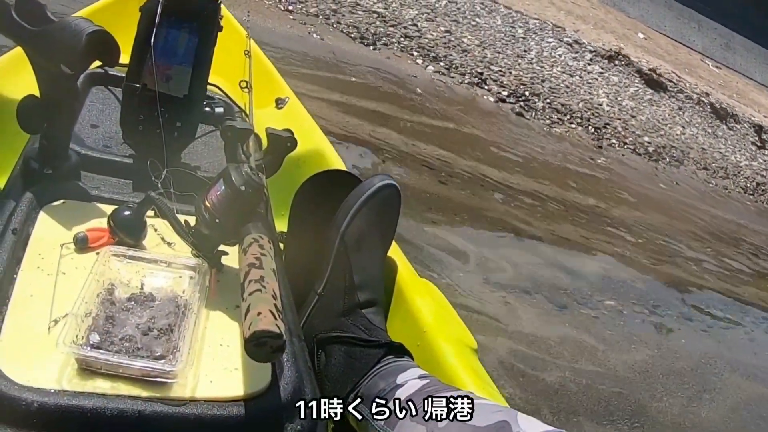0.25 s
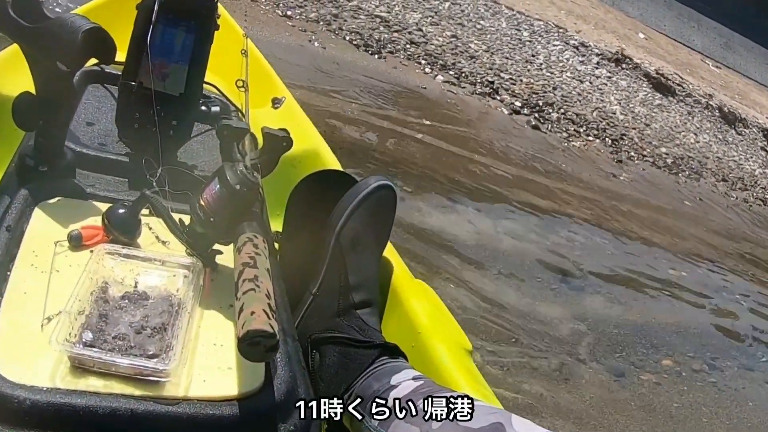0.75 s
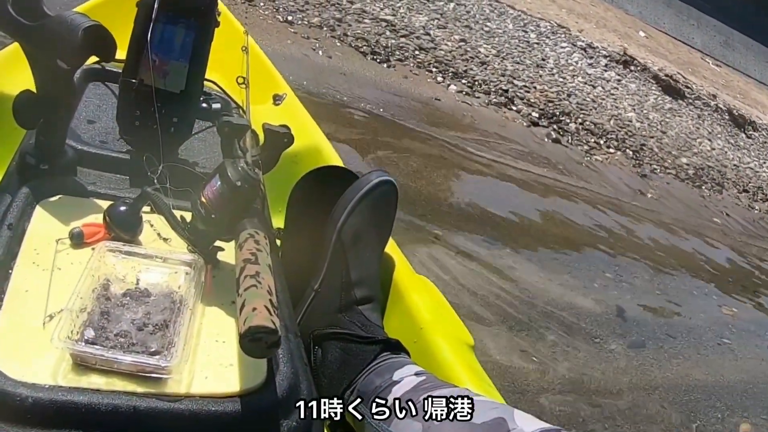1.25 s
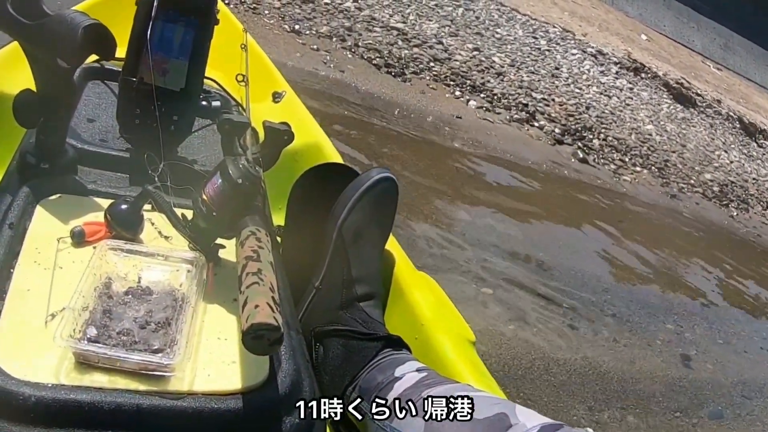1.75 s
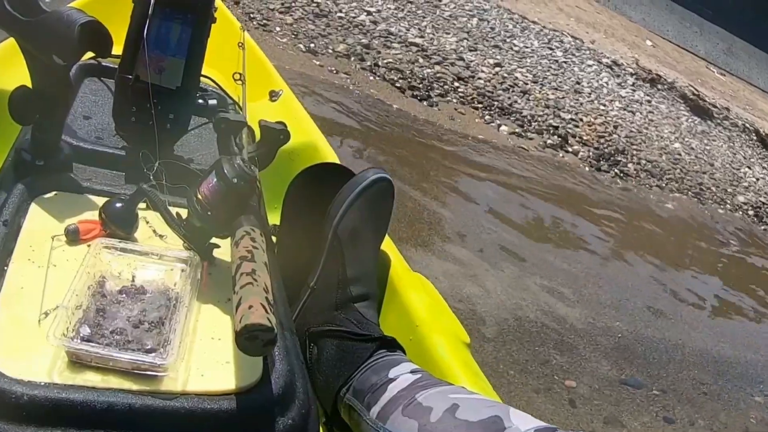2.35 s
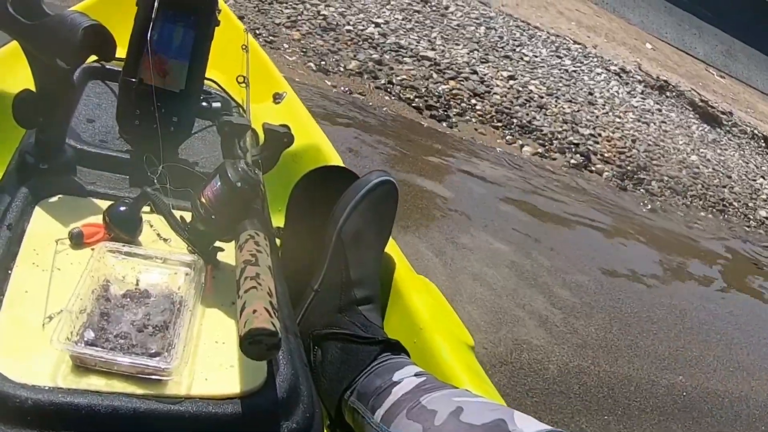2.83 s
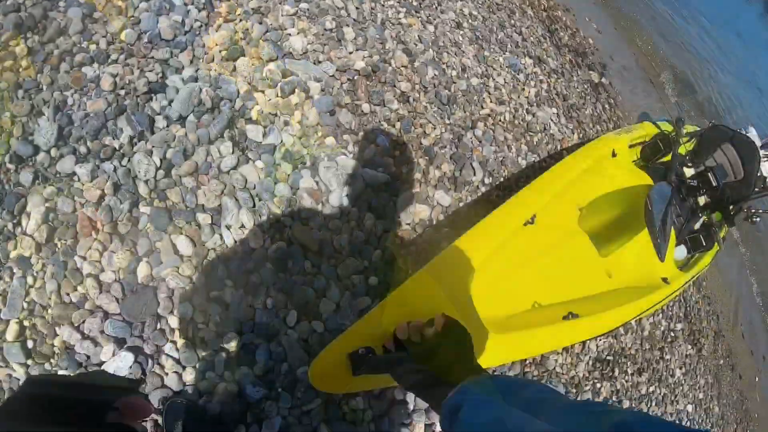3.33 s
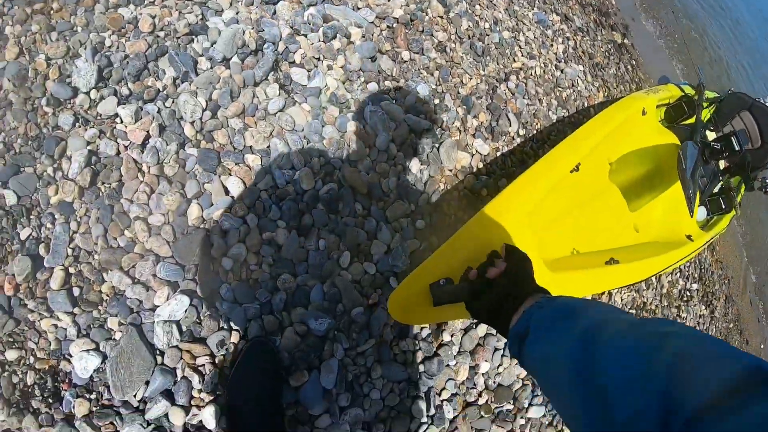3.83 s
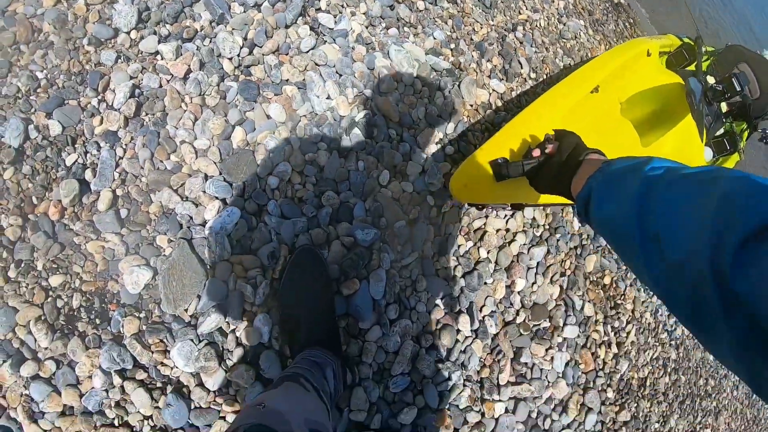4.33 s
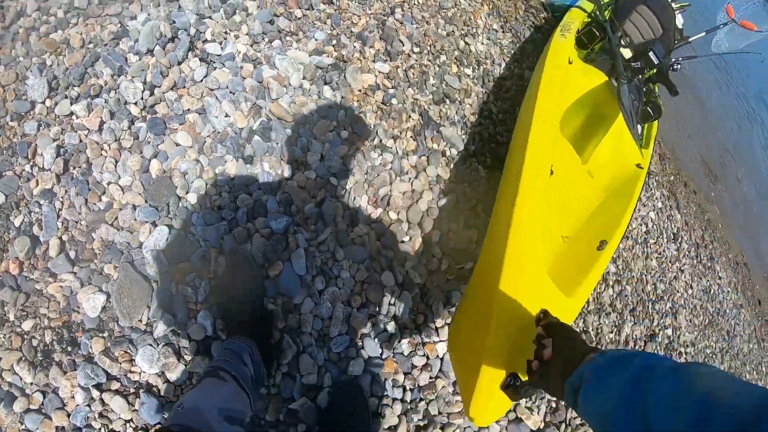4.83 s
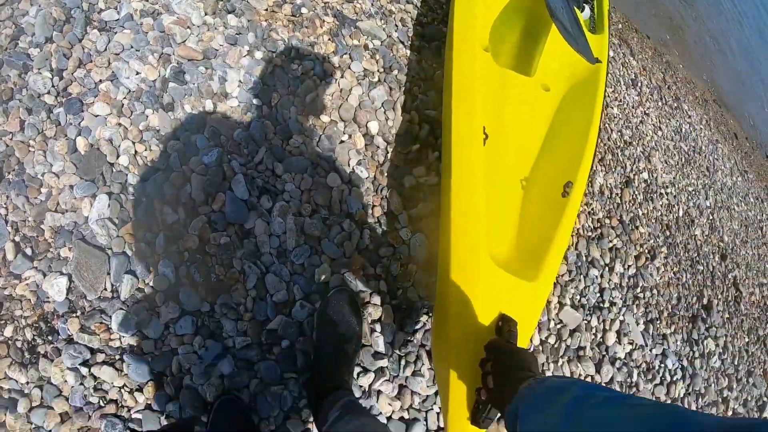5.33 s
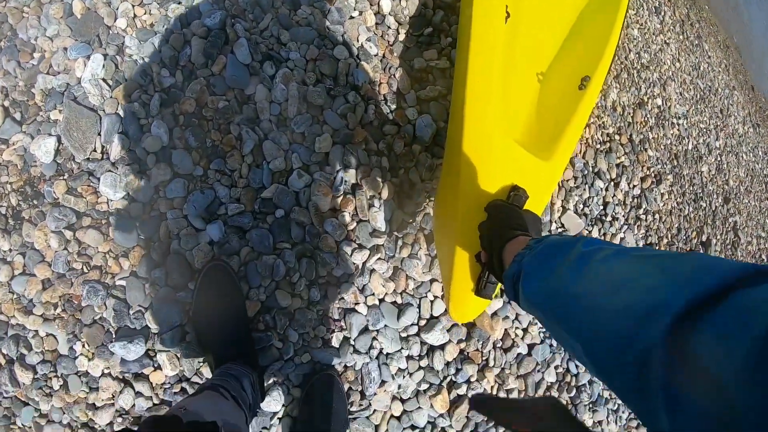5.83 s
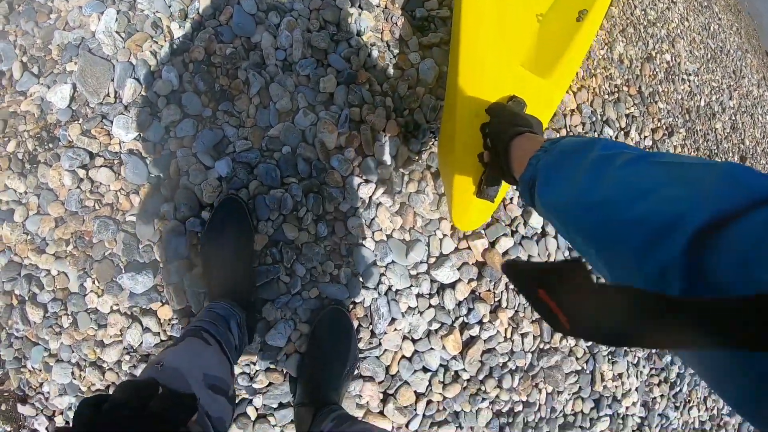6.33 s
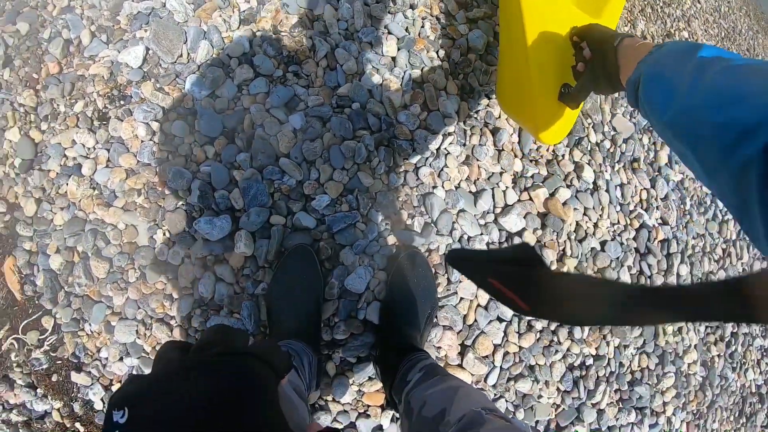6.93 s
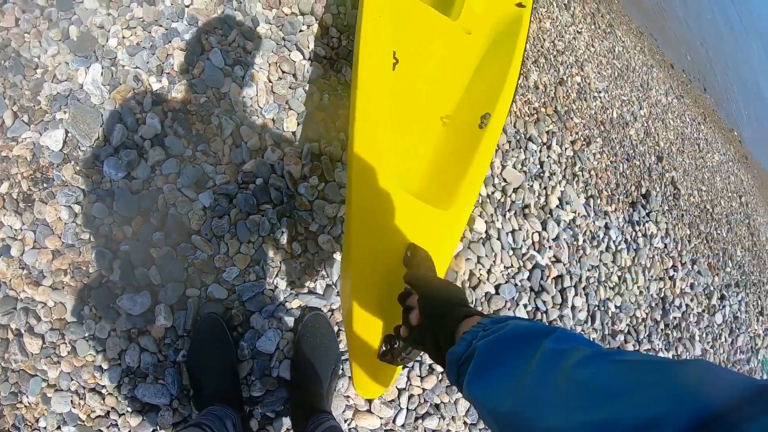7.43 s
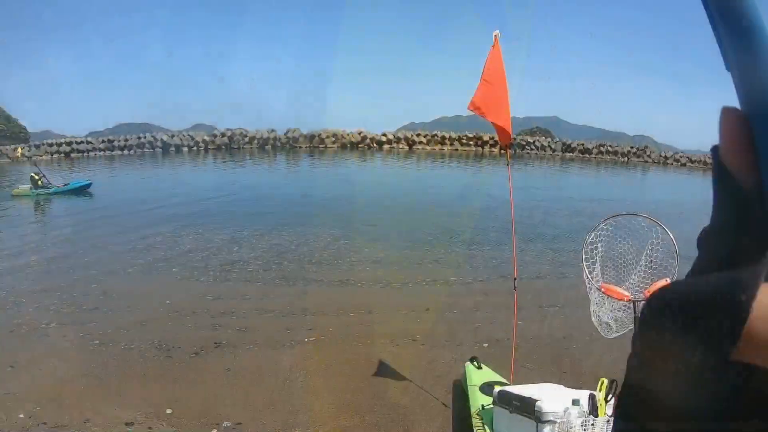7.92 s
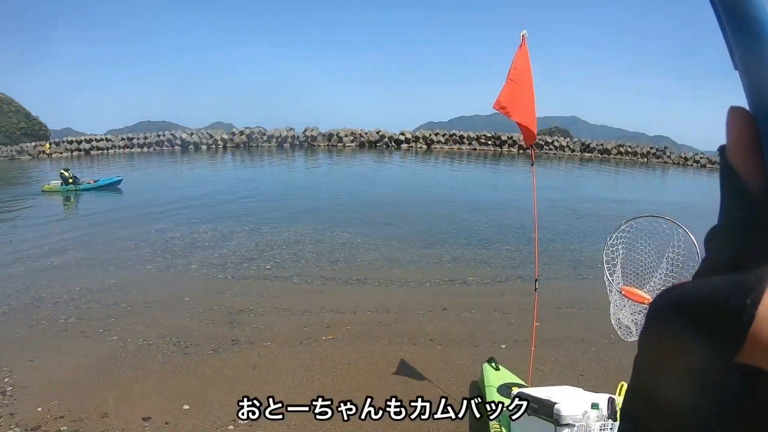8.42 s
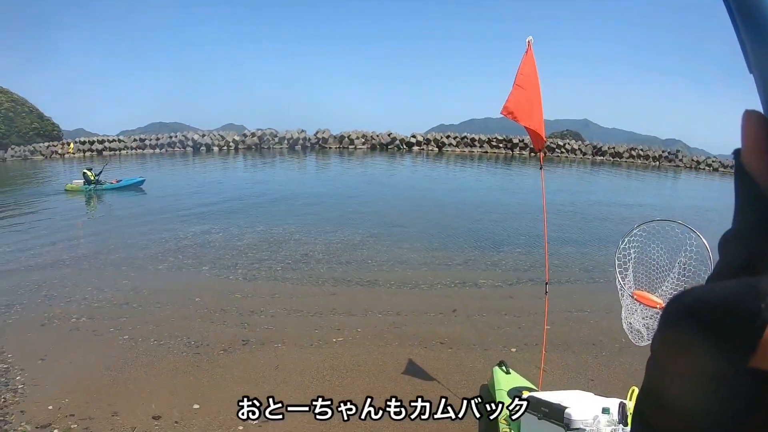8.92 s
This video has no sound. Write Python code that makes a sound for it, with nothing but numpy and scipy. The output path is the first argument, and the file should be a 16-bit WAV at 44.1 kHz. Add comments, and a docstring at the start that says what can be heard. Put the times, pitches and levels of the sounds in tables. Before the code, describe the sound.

Outdoors on a pebble beach, heard from a body-worn microphone: first a nearly mono rumble of wind, low droning hum, little bubbles and drops, and a growing sandy hiss. Next come loud, wide, irregular pebble crunches with sharp stone clicks and dull drum-like knocks from a dragged plastic boat. After the hauling stops, only low buffeting wind, quiet water and tiny ticks remain.

```python
"""Landing a plastic kayak

Afloat, turbulence rumbles at the microphone ports over a distant hum, wavelets and a keel hissing onto sand.
Then boots crunch on pebbles, as bursts of noise and short ringing stones, while the hollow hull is hauled
in jerks: its damped modes boom when struck. At last wind, a murmur of water and small ticks remain.
The opening and the close are nearly without stereo width.
"""
import sys
import numpy as np
from scipy import signal
from scipy.fft import rfft, irfft, next_fast_len
from scipy.io import wavfile

SR = 44100
rng = np.random.default_rng(int(sys.argv[2]) if len(sys.argv) > 2 else 0)


def transcribe(u):
    """Save the signal u as a 16-bit wav file named by the first command-line argument.

    u: samples, shape (n,) or (channels, n), limited to [-1, 1]; the rate is SR.
    q: integer samples, one column per channel.
    """
    v = np.clip(np.atleast_2d(u).T, -1, 1)
    q = np.round(v * 32767).astype(np.int16)
    wavfile.write(sys.argv[1], SR, q)


N = 404454

# Boots pressing into pebbles. Each row: full load reached in seconds, hold in seconds, level in dB,
# rise and fall in seconds per 20 dB, grind relative to the level in dB, treble gain in dB, left-right in dB.
BOOT_PRESSES = [(3.4, 0.12, -38.5, 0.038, 0.23, -7, -28, -2.5),
                (3.55, 0.031, -28, 0.22, 0.48, -9.5, 2, 1.5),
                (3.78, 0.019, -30, 0.019, 0.093, -5.5, -13, 2),
                (3.85, 0.072, -30, 0.16, 0.11, -18, -3.5, -2),
                (4.04, .02, -28.5, 0.09, 0.013, -13.5, -3.5, -0.5),
                (4.085, 0.0077, -29.5, 0.022, 0.027, -6.5, -0.5, 1),
                (4.15, 0.0052, -29, 0.055, 0.039, -10.5, -18.5, -2),
                (4.25, 0.082, -38, 0.24, 0.091, -6.5, -2, 2.5),
                (4.43, 0.0054, -37.5, 0.037, 0.05, -2, -4, -2), (4.55, .01, -38, 0.052, 0.081, 0, -17, 1),
                (4.76, 0.076, -25.5, 0.12, 0.26, -9.5, -17, 2),
                (4.95, 0.041, -33.5, 0.053, 0.096, -8, 1, 2),
                (5.055, 0.0067, -27.5, 0.03, 0.057, 1, -6, 2.5), (5.22, .04, -29, 0.13, .2, -14.5, -0.5, 2),
                (5.33, .01, -39, 0.036, .06, -13, -7.5, 3), (5.44, 0.03, -28.5, 0.17, .1, -14.5, 9, 2.5),
                (5.51, 0.012, -28, 0.079, .02, -22.5, 5, 1), (5.62, .01, -28, 0.13, 0.11, -13, 1, 0),
                (5.669, .02, -29, 0.11, .15, -15.5, 1, 1), (5.8, 0.19, -48.5, 0.12, 0.15, -32.5, 5, 0.5),
                (6.03, .03, -56, .1, .1, -20, 9.5, -1), (6.09, 0.0037, -44.5, 0.033, 0.013, 2, 10, 4),
                (6.148, 0.0033, -38, 0.015, 0.01, -3.5, 2, 0),
                (6.19, 0.0056, -35, 0.018, 0.017, -5, -2.5, 1.5),
                (6.38, 0.045, -26.5, 0.19, 0.27, -13.5, -5, 4), (6.49, 0.041, -27, 0.16, 0.14, -17.5, 6, 4),
                (6.58, 0.011, -34.5, 0.046, 0.029, -1.5, 3, 3), (6.72, .08, -52, .1, .1, 0, -4.5, 2),
                (6.83, 0.0045, -41.5, 0.014, 0.26, -5, -10, 1),
                (6.99, 0.019, -35.5, 0.06, 0.046, -1, -11, 2), (7.1, .12, -55.5, .1, .1, 3, -7, -1),
                (7.29, 0.12, -37, .07, 0.038, -3, -2, 1), (7.47, 0.012, -39, 0.045, .1, 13, -1, 6),
                (7.55, 0.0087, -28.5, 0.096, 0.089, -4, 4.5, 4.5),
                (7.62, 0.0062, -29.5, 0.11, 0.1, -6, 3, 0.5),
                (7.71, 0.0072, -41.5, 0.035, 0.061, -10, 5, 3.5),
                (7.81, 0.025, -42, 0.056, 0.077, -12, -11, 0)]
# Jerks of the hull over the stones. Each row: full speed reached in seconds, hold in seconds, level in dB,
# rise and fall in seconds per 20 dB, grind and keel thump relative to the level in dB.
HULL_JERKS = [(4.05, 0.0082, -35, .06, 0.079, -17, -14), (4.35, 0.058, -42, 0.13, .1, -8.5, -12),
              (4.5, 0.0075, -17, 0.058, 0.092, -11.5, -34), (4.56, 0.017, -14, 0.027, 0.089, -15, -7.5),
              (4.63, 0.082, -19.5, 0.19, .12, -9, -4.5), (4.78, 0.0083, -25, 0.1, 0.11, -16.5, -26),
              (4.92, 0.036, -21, 0.089, 0.35, -10, -12.5), (5.089, 0.05, -16, 0.073, .2, -13.5, -19),
              (5.25, 0.015, -35, 0.085, 0.049, -9.5, -0.5), (5.74, 0.017, -35.5, 0.28, 0.094, -18.5, -14),
              (6.4, .17, -44, 0.11, .1, -9.5, -18.5), (6.84, 0.086, -30.5, .12, 0.058, -13, -14.5),
              (7.0, 0.086, -21.5, .05, 0.25, -13.5, -12.5), (7.17, 0.017, -29, 0.11, .06, -6.5, -10),
              (7.27, 0.14, -29.5, .1, 0.22, -5.5, -8), (7.46, 0.037, -19.5, 0.071, 0.13, -14, -21),
              (7.561, 0.015, -15.5, 0.092, 0.17, -15, -17), (7.67, .01, -40, 0.044, 0.84, -32, 1.5)]
# Single stones clacking. Each row: start in seconds, strength in dB, main pitch in Hz, left-right in dB.
STONE_CLACKS = [(3.2914, -34, 1480, -4.0), (3.3119, -34, 2120, -4), (3.3398, -40, 1220, -6),
                (3.382, -33.5, 1210, -17), (3.4008, -15, 2970, -7), (3.4301, -27, 4860, -8),
                (3.4705, -15, 4020, -3), (3.5219, -27, 5090, -5.0), (3.5528, -13, 3980, 2),
                (3.61, -12, 3000, -3.0), (3.6287, -16, 4790, -3), (3.6671, -12, 6060, -6.0),
                (3.7768, -21.5, 1200, -4.5), (3.801, -11, 6450, -5.0), (3.8124, -21, 3190, -6.5),
                (3.8442, -13, 6470, -10), (3.8522, -13, 4270, -8.5), (3.8611, -13.5, 3930, -20),
                (3.8771, -19, 3170, -12), (3.903, -19, 3260, -8.5), (3.9297, -17, 3290, -14),
                (3.969, -15, 3860, -10), (3.995, -9.5, 5340, -13), (4.013, -18, 3340, -11),
                (4.0302, -6, 4700, -16), (4.0463, -9, 5300, -8.0), (4.056, -9.5, 4290, -15),
                (4.087, -18, 3150, -11), (4.123, -26, 6370, -7.0), (4.133, -14, 6600, -5.5),
                (4.1454, -20, 3270, -6.5), (4.191, -16.5, 9700, -17), (4.226, -15.5, 4160, -4),
                (4.2448, -24, 4310, -3.5), (4.2762, -32, 3380, -3.5), (4.2824, -28, 3040, -2),
                (4.3195, -23, 3100, -3.0), (4.3283, -23.5, 3200, -5.5), (4.4267, -26, 2800, -5.5),
                (4.4785, -21, 1690, -10), (4.5057, -19, 1510, -12), (4.543, -16.5, 1410, -16),
                (4.5742, -15, 1580, -9), (4.596, -16, 1480, -9), (4.6254, -25, 1600, -7.0),
                (4.665, -20, 1360, -11), (4.7025, -14.5, 3080, -9), (4.7702, -15.5, 3030, -12),
                (4.8904, -5.5, 10200, -18), (4.9347, -22, 1380, -8), (4.9531, -4.5, 6850, -9),
                (4.9756, -12, 3480, -7), (5.0015, -19, 3370, -9), (5.0489, -8.5, 4430, -6),
                (5.0943, -18, 1700, -12), (5.1213, -19, 1540, -10), (5.1632, -27, 1410, -4.5),
                (5.1904, -14, 6640, -4.0), (5.217, -10, 5640, -3), (5.2609, -10, 5900, -9),
                (5.3115, -8, 5450, -4), (5.3564, -27, 3220, -4.0), (5.4036, -14, 8920, -4.5),
                (5.432, -14, 4600, -4.0), (5.5128, -8, 4020, -1), (5.5478, -3.5, 4940, -5),
                (5.5604, -10, 4500, -6.0), (5.5732, -15, 3370, -7), (5.5836, -5, 4700, -4.0),
                (5.6133, -8, 6800, 0), (5.6204, -10, 6970, -4.5), (5.6461, -9, 9680, -5.5),
                (5.698, -12, 4450, -9), (5.712, -16, 6240, -7.5), (5.7324, -23, 3950, -6.5),
                (5.7544, -20, 3700, -7.0), (5.764, -9.5, 8930, -12), (5.8018, -13, 5800, -8),
                (5.8374, -25, 9990, -7.5), (5.848, -12, 10000, -11), (5.8704, -23, 9650, -5.5),
                (5.881, -17, 9400, -12), (5.8904, -26, 9380, -8.0), (5.907, -26.5, 4730, -20),
                (5.9164, -33, 3900, -3), (5.9458, -25, 9900, -12), (5.9608, -10, 9500, -10.5),
                (5.972, -23, 9980, -12), (5.9815, -17.5, 9190, -13), (6.0062, -33, 8730, -5.0),
                (6.026, -30, 9000, -16), (6.0571, -40, 3250, -4.0), (6.0836, -11, 6450, -7),
                (6.127, -35, 8060, -2.5), (6.1452, -15, 5970, -6), (6.1818, -25, 6070, -4.0),
                (6.2274, -32, 2970, -2.5), (6.2537, -19, 3460, -2.5), (6.2834, -21, 2360, -4.0),
                (6.325, -20, 3970, -1.0), (6.3504, -26, 3210, -2.0), (6.452, -16, 3440, -4.5),
                (6.569, -18, 3440, -4.0), (6.636, -12.5, 3950, 1), (6.6958, -32, 4240, -2.0),
                (6.7147, -24, 4400, -2.0), (6.833, -15.5, 8360, -7), (6.8644, -35, 1490, -3.5),
                (6.9237, -31, 2320, -2.5), (6.9566, -35, 3070, -4.0), (6.998, -31, 1220, -1),
                (7.0464, -30, 1490, 2), (7.1092, -22, 1510, 0), (7.15, -25, 2570, 1),
                (7.169, -27, 1290, -2.5), (7.245, -23, 1510, 1), (7.2734, -32, 1300, -3.5),
                (7.3327, -27, 2930, -3.5), (7.3956, -25, 1400, 5), (7.4631, -18, 1520, 7),
                (7.5024, -19, 1810, -0.5), (7.5213, -19, 1920, 0), (7.5443, -14, 4400, -2),
                (7.6051, -15, 5280, 1), (7.707, -15.5, 5300, -4), (7.7493, -25, 3270, -4),
                (7.794, -20, 9700, -10), (7.8138, -27.5, 3200, -1), (7.8316, -31, 3100, -11),
                (7.9007, -27.5, 4000, -6)]
# Spectra of pebbles crunching and grinding. Each row: frequency in Hz, density in dB per Hz.
CRUNCH_SPECTRUM = [(350, -19.5), (600, -22), (1190, -5), (1640, -12.5), (1930, -8), (2830, -5),
                   (3120, -1.5), (4710, -1.5), (8160, -6.5), (9110, -5.5), (10200, -10), (13900, -34),
                   (15100, -30), (16000, -51.5)]
GRIND_SPECTRUM = [(290, -31), (500, 1), (694, -2.5), (963, -5.5), (1300, -6), (1390, -6), (1570, -7.5),
                  (1840, -9.5), (2200, -12), (4370, -24.5), (5000, -32), (6500, -52.5), (11000, -120)]
# Balance of the pebbles. Each row: frequency in Hz, left-right in dB.
PEBBLE_BALANCE = [(60, -1), (130, 11.5), (290, 12), (640, -9), (1410, -4.5), (3100, -5), (6820, -6),
                  (15000, -26)]
# Likeness of the pebble channels. Each row: frequency in Hz, left-right likeness (1 is identical).
PEBBLE_LIKENESS = [(500, 0.72), (3000, 0.41), (7000, 0.25), (14000, 0.1)]
# Modes of the hull. Each row: frequency in Hz, bandwidth in Hz, level in dB.
HULL_MODES = [(88, 32, -31.5), (116.4, 23, -29), (155, 30, -16), (171.6, 23, 2), (197.8, 14, -4),
              (258, 32, -3), (304.5, 21, -5.5), (387.6, 50, 0.5), (469, 47, -7.5), (530, 35, -14),
              (620, 120, -21.5), (720, 90, -15.5), (1410, 90, -34), (1577, 74, -18.5)]
# Large stones striking the hull. Each row: start in seconds, strength in dB,
# sharpness in dB (-20 leaves the modes above 1 kHz as they are).
HULL_BUMPS = [(4.039, -24.5, -19), (4.239, -34, -18), (4.305, -27, -2), (4.404, -21.5, -20),
              (4.495, -4.5, -16), (4.541, -9.5, 11), (4.685, -23, -19), (4.762, -17.5, -28),
              (4.892, -23, -26), (4.91, -32, -22), (5.082, -8, -18), (5.399, -26, -4), (5.489, -50, -12),
              (5.722, -50, -18), (5.861, -34, -9), (6.281, -26.5, -5), (6.342, -27, 0), (6.678, -44, 2),
              (6.722, -41, -4), (6.783, -27.5, 2), (6.849, -15.5, -25), (7.003, -12, -26),
              (7.254, -18.5, -7), (7.449, -20, -25), (7.639, -12, -27)]
# Faint narrow scrape of the keel. Each row: time in seconds, level in dB.
SCRAPE_LEVEL = [(6.62, -59), (6.72, -58), (6.82, -46), (6.9, -65)]
# Its spectrum. Each row: frequency in Hz, density in dB per Hz.
SCRAPE_SPECTRUM = [(900, -48), (1330, -11), (1500, -0.5), (1650, -17), (2400, -50)]
# Keel sliding onto wet sand. Each row: time in seconds, level in dB.
KEEL_LEVEL = [(.8, -61), (1.04, -56), (1.56, -49), (1.86, -53.5), (2.07, -46.5), (2.44, -44.5),
              (3.06, -44.5), (3.3, -55)]
# Its spectrum. Each row: frequency in Hz, density in dB per Hz.
SAND_SPECTRUM = [(410, -17), (700, -2), (759, -17), (823, -1), (917, -6), (1110, 2), (1400, -4.5),
                 (1740, 0), (1930, -1), (2310, -1), (2950, -10.5), (3690, -11.5), (6000, -26), (7800, -29),
                 (13200, -120)]
# Wavelets. Each row: time in seconds, wash level in dB, fizz level in dB.
WATER_LEVELS = [(0, -55.5, -65), (.45, -55.5, -65.5), (.75, -52.5, -64.5), (.86, -50, -58.5),
                (1.05, -49, -53.5), (1.5, -48.5, -53), (1.9, -54, -59.5), (2.04, -45, -52.5),
                (2.2, -56, -54.5), (2.95, -50.5, -58), (3.09, -50.5, -52.5), (3.3, -49, -71)]
# Spectra of wash and fizz. Each row: frequency in Hz, density in dB per Hz.
WASH_SPECTRUM = [(120, -38), (200, 8), (211, -56), (238, -5), (316, -11), (377, -7.5), (449, -16.5),
                 (672, -13), (1030, -18.5), (3380, -23), (5000, -37), (6500, -85), (11000, -120)]
FIZZ_SPECTRUM = [(1470, -22), (2500, -12), (2940, -4), (3490, -6.5), (6200, -13), (7530, -17), (9660, -11),
                 (11500, -28), (14200, -32), (16000, -72)]
# Gurgles against the hull. Each row: start in seconds, strength in dB, starting pitch in Hz.
AIR_POCKETS = [(0.269, -47, 528), (0.316, -52, 482), (0.393, -37, 388), (0.508, -50, 441),
               (0.619, -43, 719), (0.759, -52, 654), (0.814, -37, 423), (0.869, -33, 616), (0.94, -36, 573),
               (0.978, -46, 610), (1.02, -30, 1320), (1.074, -46, 598), (1.127, -32, 762),
               (1.171, -33, 584), (1.223, -31, 720), (1.297, -26.5, 690), (1.547, -26, 1090),
               (1.616, -26, 1620), (1.916, -44, 650), (2.012, -36.5, 546)]
# Drops afloat and small ticks at the end. Each row: start in seconds, strength in dB, main pitch in Hz,
# left-right in dB before the stereo width is narrowed.
DROP_EVENTS = [(0.0818, -42, 3430, 0.0), (0.114, -41, 3210, 0.0), (0.8136, -52, 2500, 6),
               (0.8425, -34, 3530, -6), (0.865, -28, 4870, -4), (0.901, -53, 2560, -3),
               (0.9934, -49, 3660, 0.0), (1.0295, -50, 3220, 0.0), (1.068, -38, 3420, 0.0),
               (1.1354, -48, 3540, 0.0), (1.2586, -45, 3060, 0.0), (1.296, -37, 2890, 0.0),
               (1.3414, -46, 2800, 0.0), (1.4072, -34, 3020, 0.0), (1.4373, -35, 3140, 5),
               (1.4645, -30, 2870, -0.5), (1.4921, -35, 3130, -2.0), (1.5783, -34, 3370, -6),
               (1.7076, -37.5, 3400, -16), (1.901, -37, 2530, -15), (2.0196, -32.5, 2660, -8),
               (2.1146, -33, 2760, -1.0), (2.158, -34, 3630, -1.5), (2.3128, -31.5, 3600, -9),
               (2.4339, -42, 2590, -3.0), (2.507, -45, 3330, -3), (2.7856, -40, 2500, 1.5),
               (2.9058, -32, 2500, 0.5), (3.0016, -45, 2650, 2.5), (3.1837, -35, 3160, -11)]
TICK_EVENTS = [(7.9792, -61, 1710, -0.5), (8.055, -42, 1780, 0.0), (8.108, -38, 1470, 0.0),
               (8.1354, -34, 1620, 0.0), (8.1533, -31, 1770, 0.0), (8.2586, -47, 1800, 0.0),
               (8.2851, -44, 1680, 0.0), (8.314, -58, 1030, 0.0), (8.3679, -36.5, 1364, 0.0),
               (8.4552, -52, 1280, 0.0), (8.6058, -49, 1600, 0.0), (8.7301, -38, 1840, 0.0),
               (8.7894, -61, 1500, 0.0), (8.8144, -54, 1110, 0.0), (8.8388, -40, 1980, 0.0),
               (8.8947, -43, 1400, 0.0), (8.9234, -40, 1016, 0.0), (9.0748, -51, 1073, 0.0)]
# Distant hum. Each row: time in seconds, level of the fundamental in dB.
HUM_LEVEL = [(0, -36.5), (.25, -42), (1.55, -36.5), (2.05, -49), (2.8, -52), (3.2, -59)]
# Wind on the ports, one list afloat and one at the end. Each row: time in seconds, rumble in dB, flutter in dB.
WIND_LEVELS = [
    [(0, -37, -40.5), (.3, -33, -44.5), (.45, -31, -46), (.6, -32.5, -49), (.9, -36.5, -54),
     (1.3, -36.5, -55), (1.55, -31.5, -53), (1.73, -28, -44), (1.82, -35, -47.5), (2.0, -37.5, -38),
     (2.5, -34.5, -35.5), (2.6, -33.5, -33.5), (3.0, -39.5, -33.5), (3.3, -43, -39.5)],
    [(7.8, -59, -47), (7.87, -37, -59), (8.14, -47, -40), (8.45, -41.5, -37.5), (8.7, -40, -42),
     (8.78, -32, -36.5), (9.1, -34.5, -34.5), (9.17, -34.5, -41.5)],
]
# Spectrum of the rumble. Each row: frequency in Hz, density in dB per Hz.
RUMBLE_SPECTRUM = [(8.8, -42), (15, 0), (86, 3), (102, -12), (119, -3), (183, -13), (200, -14.5),
                   (260, -42), (440, -120)]
# Spectra of the flutter, one list afloat and one at the end. Each row: frequency in Hz, density in dB per Hz.
FLUTTER_SPECTRA = [
    [(35, -35.5), (60, -2), (87, -2.5), (124, -5), (271, -12), (472, -22.5), (517, -23), (900, -35),
     (1170, -55), (1980, -120)],
    [(35, -25), (60, -0.5), (118, -8.5), (163, 0), (221, -14.5), (307, -20), (412, -27.5), (900, -47),
     (1170, -90), (1980, -120)],
]
# Beach air around the boots. Each row: time in seconds, level in dB.
BEACH_LEVEL = [(3.4, -39), (4.3, -45.5), (5.0, -44.5), (5.7, -41), (5.95, -51.5), (6.25, -45.5), (6.7, -46),
               (7.2, -47.5), (7.75, -46)]
# Its spectrum. Each row: frequency in Hz, density in dB per Hz.
BEACH_SPECTRUM = [(12, -45), (30, -22), (85, 9), (328, -8), (455, -4.5), (687, -29.5), (954, -12),
                  (1190, -12), (1700, -15.5), (3370, -14), (7250, -26), (9280, -22), (14000, -37.5)]
# Calm shore murmur at the end. Each row: time in seconds, level in dB.
MURMUR_LEVEL = [(7.8, -56), (7.868, -54.5), (8.588, -56), (8.796, -57), (8.986, -58), (9.17, -62)]
# Its spectrum. Each row: frequency in Hz, density in dB per Hz.
SHORE_SPECTRUM = [(150, -38.5), (250, -9.5), (291, -0.5), (356, -10.5), (610, -17), (1120, -19.5),
                  (1980, -18.5), (2350, -26), (2640, -23.5), (9190, -48.5), (11100, -60), (14000, -79)]
# Stereo width. Each row: time in seconds, share of side sound kept.
STEREO_WIDTH = [(0, .002), (.05, 0.055), (.25, 0.073), (.29, .002), (1.44, .002), (1.5, 0.69), (3.2, 1),
                (7.88, 0.91), (7.96, .002), (9.2, 0.0015)]

GUST_DB, GUSTS_PER_S = -0.5, 4.6
HUM_HZ, OCTAVE_DB = 91.3, -10.5   # the octave is relative to the fundamental
HULL_UNDER_BOOT_DB, THUMP_UNDER_BOOT_DB, TREBLE_HZ = -17, -21, 7000
HULL_PAN_DB = -1
IDLE_DB = -60   # floor of the swells
CONTACT_S = .0002   # time constant of a strike's onset
CUTOFF_HZ = 16300
OPPOSED = np.array([[1], [-1]])   # left and right with opposite sign


def pebbles():
    """Granular friction: stones slip in clumps, denser under a harder press; boots and hull grind them."""
    crunch_db = swells(BOOT_PRESSES)
    boot_grind_db = swells(BOOT_PRESSES, np.transpose(BOOT_PRESSES)[5])
    hull_grind_db = swells(HULL_JERKS, np.transpose(HULL_JERKS)[5])
    grind_gain = power_sum(boot_grind_db, hull_grind_db)
    press = from_db(0.66 * (crunch_db + 40))
    slips = grains(1800 * press * from_db(3 * drift(60)), 4.4) / np.sqrt(press)
    mid, side = bursts(slips, 0.023)
    # stones of all sizes ring briefly, each at its own pitch
    dealt = rng.integers(0, 36, N)
    stones = 0
    for k, hz in enumerate(np.geomspace(1800, 14000, 36)):
        stones = stones + hz * ring(slips * (dealt == k), hz, 45 / hz)
    crunch = colour(spread(rms_one(mid) + 1.1 * rms_one(stones), rms_one(side)), CRUNCH_SPECTRUM)
    rubbing = bursts(grains(1500 * from_db(2.3 * drift(23)), 1.2), 0.021)
    grind = colour(spread(*rubbing), GRIND_SPECTRUM)
    treble_db, lean_db = in_time([(row[0], *row[-2:]) for row in BOOT_PRESSES])
    treble = filtered(crunch, signal.butter, 1, TREBLE_HZ, "high")
    crunch = crunch + (from_db(treble_db) - 1) * treble
    return ashore() * (panned(from_db(crunch_db) * crunch, lean_db) + grind_gain * grind)


def clacks():
    """Impact: single stones ring in short modes."""
    return strikes(STONE_CLACKS, cycles=34, crack_db=2)


def hull():
    """Modal resonance: stones under the keel knock the hollow plastic, which rings in its damped modes."""
    boot_db, gate = swells(BOOT_PRESSES), ashore()
    hull_gain = power_sum(swells(HULL_JERKS), boot_db + HULL_UNDER_BOOT_DB)   # footfalls shake it too
    jerk_thump_db = swells(HULL_JERKS, np.transpose(HULL_JERKS)[-1])
    thump_gain = power_sum(jerk_thump_db, boot_db + THUMP_UNDER_BOOT_DB)
    knocks = grains(600 * from_db(3 * drift(25)), 1.3)
    at = [round(row[0] * SR) for row in HULL_BUMPS]
    _, strength_db, sharp_db = np.transpose(HULL_BUMPS)
    body, blows = 0, 0
    for hz, width_hz, level_db in HULL_MODES:
        t60 = np.log(1000) / (np.pi * width_hz)
        body = body + from_db(level_db) * ring(knocks * rng.standard_normal(N), hz, t60)
        blow_db = strength_db - 9.5 + level_db + (hz > 1000) * (sharp_db + 20)
        clicks = np.zeros(N)
        clicks[at] = from_db(blow_db) * rng.standard_normal(len(at))
        blows = blows + ring(clicks, hz, t60)
    low = rms_one(filtered(rng.standard_normal((2, N)), signal.butter, 3, [40, 105], "band"))
    # a low thump, largely alike in both channels
    thump = gate * thump_gain * from_db(3.0 * drift(12)) * pair(*low, 0.88)
    sound = gate * hull_gain * rms_one(body) + blows
    sound = filtered(sound, signal.butter, 3, 60, "high")   # the deep bass is cut below 60 Hz
    echo = np.roll(sound, round(0.0033 * SR))   # off the slope, reaching the ports unevenly
    return thump + panned(sound, HULL_PAN_DB) + from_db(-21.5) * echo * OPPOSED


def scrape():
    """Friction: a faint scrape of the keel, as narrow-band noise."""
    return hiss(SCRAPE_LEVEL, SCRAPE_SPECTRUM, alike=.6, patchy_db=1.5)


def keel_on_sand():
    """Friction: the keel slides onto wet sand, as coloured noise."""
    return hiss(KEEL_LEVEL, SAND_SPECTRUM, alike=0.14, patchy_db=0.94)


def water():
    """Bubble resonance: wash is noise with soft ringing bubbles; fizz is a dense spray of tiny bursts."""
    wash_db, fizz_db, gate = in_time(WATER_LEVELS, fade=0.17)
    born, dealt = grains(500 * from_db(4 * drift(8)), 2.2), rng.integers(0, 16, N)
    bubbles = 0
    for k, hz in enumerate(np.geomspace(450, 2400, 16)):
        bubbles = bubbles + hz * ring(born * (dealt == k), hz, 30 / hz)
    noise = rng.standard_normal((2, N))
    wash = colour(pair(noise[0] + .6 * rms_one(bubbles), noise[1], .4), WASH_SPECTRUM)
    spray = bursts(grains(2500 * from_db(0.85 * drift(25)), 0.89), 0.0087)
    fizz = colour(pair(*spray, 0.07), FIZZ_SPECTRUM)
    wash_gain, fizz_gain = from_db(wash_db + 0.74 * drift(2.4)), from_db(fizz_db + 1.8 * drift(12))
    return gate * (wash_gain * wash + fizz_gain * fizz)


def gurgles():
    """Bubble resonance: each air pocket swells, rings some cycles and rises in pitch as it shrinks."""
    out, t = np.zeros(N), np.arange(2600) / SR
    for s, strength_db, hz in AIR_POCKETS:
        shape = (1 - np.exp(-t / 0.0037)) * from_db(-60 * t * hz / 35)
        i = round(s * SR)
        out[i:i + len(t)] += from_db(strength_db) * shape / 2 * np.sin(2 * np.pi * hz * t * (1 + 4 * t))
    return out


def drops():
    """Impact: drops sound as short decaying modes with a crack of noise."""
    return strikes(DROP_EVENTS, cycles=32, crack_db=0)


def ticks():
    """Impact: small ticks, lower than the drops, ringing for fewer cycles."""
    return strikes(TICK_EVENTS, cycles=22.6, crack_db=7)


def hum():
    """Periodicity: a wavering tone and its octave."""
    level_db, gate = in_time(HUM_LEVEL, fade=0.33)
    phase = 2 * np.pi * np.cumsum(HUM_HZ * (1 + 0.013 * drift(3.1))) / SR
    fundamental = from_db(level_db + 1.0 * drift(6.8)) * np.sin(phase)
    octave = from_db(level_db + OCTAVE_DB + 0.6 * drift(48)) * np.sin(2 * phase)
    tone = fundamental + octave
    late = np.roll(tone, round(0.0014 * SR))   # it arrives from one side
    return np.sqrt(2) * gate * np.array([tone, late])


def wind():
    """Turbulence: lumpy pressure noise, mostly its own at each port."""
    low = pair(*colour(rng.standard_normal((2, N)), RUMBLE_SPECTRUM), 0.33)
    low = low * from_db(GUST_DB * drift(GUSTS_PER_S))
    out = 0
    for levels, spectrum in zip(WIND_LEVELS, FLUTTER_SPECTRA):
        rumble_db, flutter_db, gate = in_time(levels, fade=0.053)
        high = pair(*colour(rng.standard_normal((2, N)), spectrum), 0.26) * from_db(1.24 * drift(26))
        out = out + gate * (from_db(rumble_db) * low + from_db(flutter_db) * high)
    return out


def beach_air():
    """Ambient noise: the air of the beach around the boots."""
    return hiss(BEACH_LEVEL, BEACH_SPECTRUM, alike=0.77, patchy_db=2.0)


def murmur():
    """Ambient noise: the calm shore, nearly alike in both channels."""
    return hiss(MURMUR_LEVEL, SHORE_SPECTRUM, alike=.9, patchy_db=1.1)


def strikes(table, cycles, crack_db):
    """Impact excitation: each event is a few short modes around its pitch and a crack of noise."""
    out, luck = np.zeros((2, N + 2000)), rng.standard_normal((len(table), 8))
    t = np.arange(1200) / SR
    onset = 1 - np.exp(-t / CONTACT_S)
    for (s, strength_db, hz, pan_db), chance in zip(table, luck):
        pitches = np.clip(hz * np.exp(np.r_[0, .15 + .3 * chance[:3]]), 300, 10500)[:, None]
        gains = from_db(np.r_[0, -7 + 3 * chance[3:6]])[:, None]
        decays = from_db(-60 * t * pitches / cycles)
        modes = np.sum(gains * np.sin(2 * np.pi * pitches * t) * decays, axis=0)
        dull_db = 9 * np.log2(min(hz / 3500, 1))   # low-pitched strikes crack less
        crack = from_db(crack_db + dull_db - 60 * t / 0.0046) * crack_noise(len(t))
        i = round(s * SR)
        out[:, i:i + len(t)] += panned(from_db(strength_db) * onset * (modes + crack) / 2, pan_db)
    return filtered(out[:, :N], signal.butter, 2, 11000, "low")


def crack_noise(size):
    """Broadband impact noise: a stereo pair, strongest in the middle treble."""
    noise = rng.standard_normal((2, size))
    return pair(*filtered(noise, signal.butter, 3, [2400, 10000], "band"), 0.65)


def hiss(table, spectrum, alike, patchy_db):
    """Filtered noise: it flickers a little under the level curve of a table."""
    level_db, gate = in_time(table, fade=0.25)
    noise = colour(pair(*rng.standard_normal((2, N)), alike), spectrum)
    return gate * from_db(level_db + patchy_db * drift(5.5)) * noise


def grains(per_s, spread_db):
    """Poisson-like excitation: random clicks of uneven size and sign."""
    sizes = from_db(spread_db * np.minimum(rng.exponential(1, N), 5)) * rng.choice([-1, 1], N)
    return sizes * (rng.random(N) < per_s / SR)


def bursts(clicks, t60):
    """Exponential decay: each click opens a puff of noise; two unrelated noises share one envelope."""
    r = from_db(-60 / (t60 * SR))
    envelope = signal.lfilter([1], [1, -r], np.abs(clicks) + 1e-18)
    return envelope * rng.standard_normal((2, N))


def ring(clicks, hz, t60):
    """Damped resonator: a unit click sets a sine of height 1 ringing."""
    r, w = from_db(-60 / (t60 * SR)), 2 * np.pi * hz / SR
    return signal.lfilter([0, np.sin(w)], [1, -2 * r * np.cos(w), r * r], clicks + 1e-18)


def swells(table, column_db=0):
    """Power addition: each row rises, holds and falls in straight dB lines; returns the level in dB."""
    t, power = np.arange(0, N, 32) / SR, from_db(2 * IDLE_DB)
    for (s, held, level_db, rise, fall, *_), more_db in zip(table, column_db + np.zeros(len(table))):
        before = np.maximum((s - t) / max(rise, .01), 0)
        after = np.maximum((t - s - held) / max(fall, .01), 0)
        power = power + from_db(2 * (level_db + more_db - 20 * (before + after)))
    return np.interp(np.arange(N) / SR, t, 10 * np.log10(power))


def power_sum(a_db, b_db):
    """Power addition: gain of two levels heard together."""
    return np.sqrt(from_db(2 * a_db) + from_db(2 * b_db))


def ashore():
    """Gating: open while the boat is hauled."""
    return in_time([(3.25, 0), (7.92, 0)], fade=0.019)[-1]


def from_db(db):
    """Logarithmic level: dB to amplitude."""
    return 10 ** (np.asarray(db) / 20)


def rms_one(x):
    """Normalization: scale to unit rms."""
    return x / np.sqrt(np.mean(x ** 2) + 1e-20)


def filtered(x, design, order, hz, kind):
    """Linear filtering with second-order sections."""
    return signal.sosfilt(design(order, hz, kind, fs=SR, output="sos"), x)


def in_time(rows, fade=None):
    """Interpolation: columns as curves; with fade, also a gate that closes outside the table."""
    s, *columns = np.transpose(rows)
    t = np.arange(N) / SR
    curves = [np.interp(t, s, c) for c in columns]
    if fade:
        curves.append(np.clip(np.minimum(t - s[0], s[-1] - t) / fade + 1, 0, 1))
    return curves


def at_hz(points, hz):
    """Interpolation along log frequency."""
    points = np.array(points)
    return np.interp(np.log(hz), np.log(points[:, 0]), points[:, 1])


def drift(rate):
    """Slow chance: noise twice through a one-pole low-pass with its corner at rate in Hz, rms 1."""
    r = np.exp(-40 * np.pi * rate / SR)   # computed at every 20th sample
    noise = rng.standard_normal(N // 20 + 4002)
    slow = signal.lfilter([1], [1, -2 * r, r * r], noise)[4000:]   # the filter has settled
    return np.interp(np.arange(N) / 20, np.arange(len(slow)), rms_one(slow))


def colour(x, spectrum, order=8192):
    """Minimum phase: a causal filter that follows a dB-per-Hz table; rms 1."""
    hz = np.maximum(np.arange(order // 2 + 1) * SR / order, 1)
    cepstrum = irfft(at_hz(spectrum, hz) * np.log(10) / 20)
    # folding the cepstrum onto positive time makes the filter causal
    cepstrum[1:order // 2] *= 2
    cepstrum[order // 2 + 1:] = 0
    response = irfft(np.exp(rfft(cepstrum)))
    return rms_one(signal.oaconvolve(np.atleast_2d(x), response[None], axes=1)[:, :N])


def pair(mid, side, alike):
    """Interchannel correlation: two unrelated sounds become left and right of a given likeness."""
    alike = np.clip(alike, 0, 1)
    return np.sqrt((1 + alike) / 2) * mid + np.sqrt((1 - alike) / 2) * side * OPPOSED


def panned(x, pan_db):
    """Level difference: positive dB leans to the left."""
    return x * from_db(pan_db / 2 * OPPOSED)


def spread(mid, side):
    """Frequency-dependent correlation: likeness and balance of the channels follow the pebble tables."""
    size = next_fast_len(N)
    hz = np.arange(size // 2 + 1) * SR / size + 1
    lean = from_db(at_hz(PEBBLE_BALANCE, hz) / 2 * OPPOSED)
    spectra = pair(rfft(mid, size), rfft(side, size), at_hz(PEBBLE_LIKENESS, hz))
    return irfft(spectra * lean, size)[:, :N]


def scene():
    """Superposition: all sources add, then the side sound is scaled by the stereo width."""
    hauling = pebbles() + clacks() + hull() + scrape()
    afloat = keel_on_sand() + water() + gurgles() + drops() + hum()
    left, right = hauling + afloat + ticks() + wind() + beach_air() + murmur()
    mid, side = (left + right) / 2, (left - right) / 2
    return mid + in_time(STEREO_WIDTH)[0] * side * OPPOSED


def record(dry):
    """Saturation and band limit: peaks are rounded, the top is cut steeply."""
    rounded = .8 * np.tanh(dry / .8)
    return signal.sosfilt(signal.cheby2(12, 70, CUTOFF_HZ, fs=SR, output="sos"), rounded)


dry = scene()
out = record(dry)
transcribe(out)
```